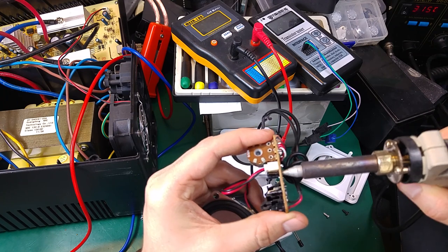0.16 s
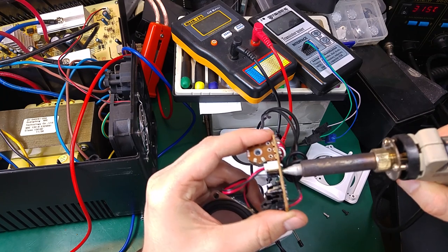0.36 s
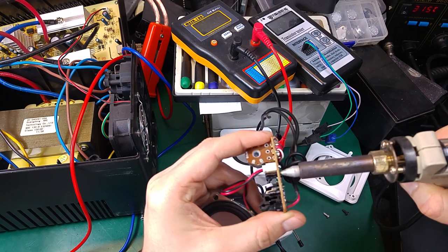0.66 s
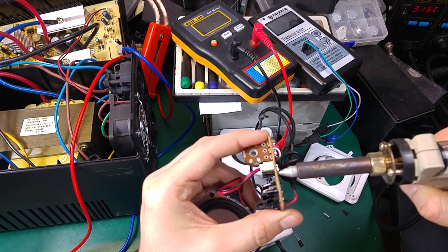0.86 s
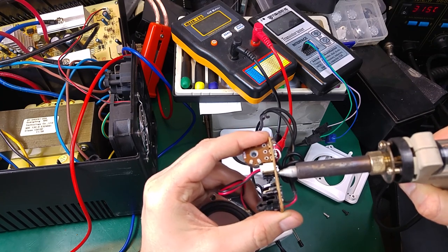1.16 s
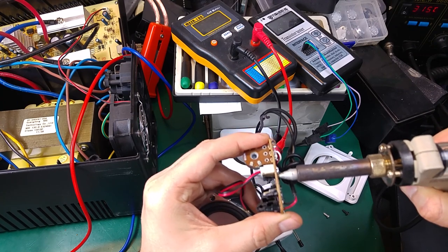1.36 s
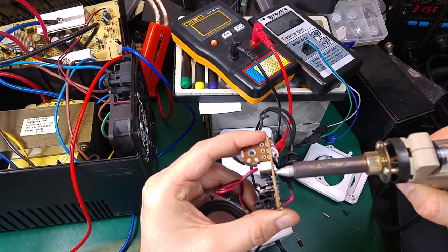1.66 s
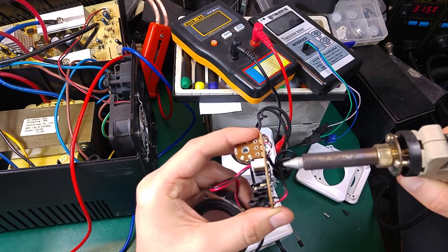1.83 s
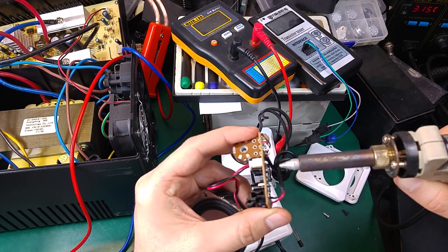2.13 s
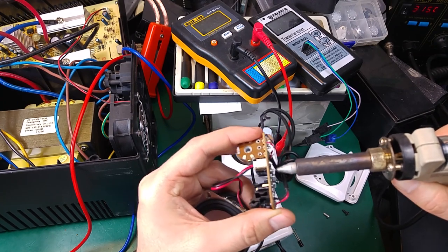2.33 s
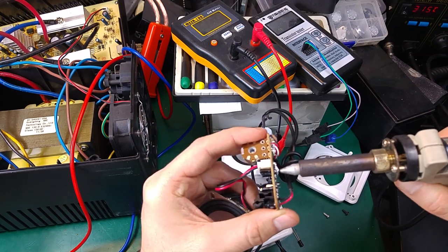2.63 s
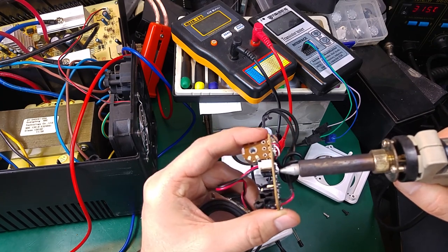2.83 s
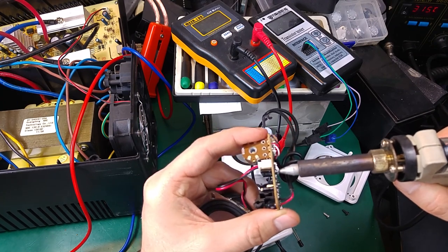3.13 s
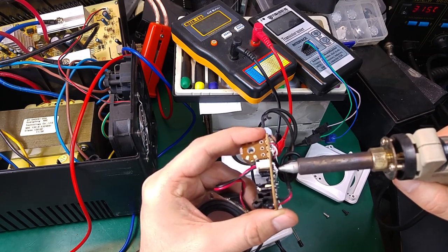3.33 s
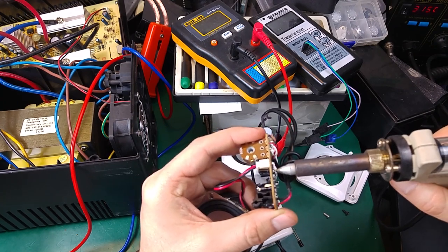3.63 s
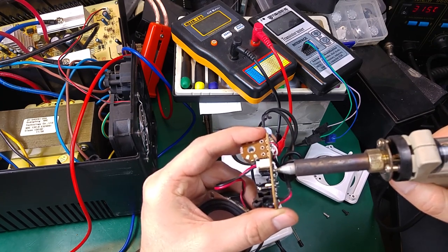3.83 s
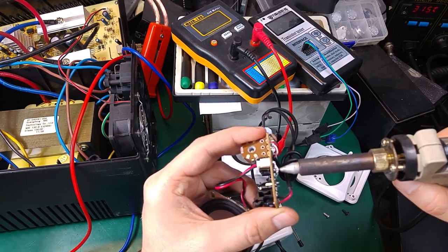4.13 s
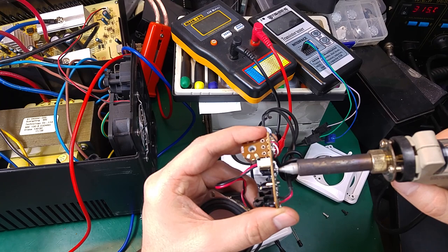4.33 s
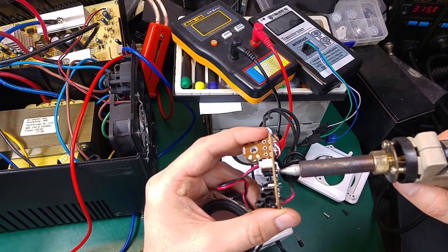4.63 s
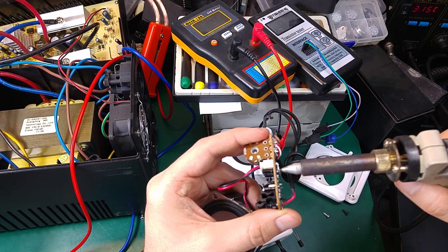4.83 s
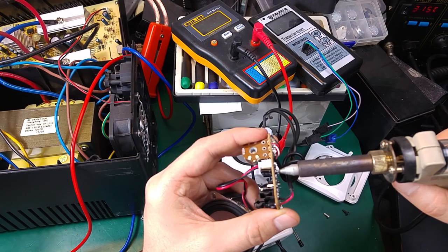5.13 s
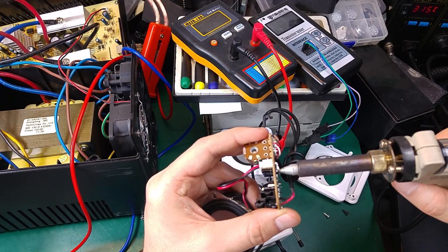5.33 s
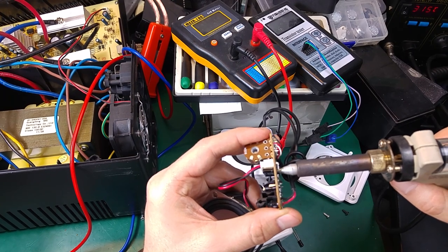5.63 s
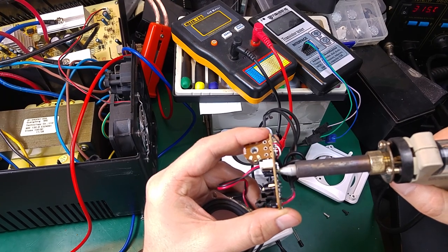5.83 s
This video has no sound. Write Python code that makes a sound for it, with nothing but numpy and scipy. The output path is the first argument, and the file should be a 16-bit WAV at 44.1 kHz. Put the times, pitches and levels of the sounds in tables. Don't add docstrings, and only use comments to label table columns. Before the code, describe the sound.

A desoldering gun's trigger snaps, its small pump buzzes hard for about a second and coasts down, over a steady blowing fan hum.

```python
import sys
import numpy as np
from scipy import signal
from scipy.fft import rfft, irfft, next_fast_len
from scipy.io import wavfile
from scipy.ndimage import uniform_filter1d

SR = 44100
rng = np.random.default_rng(int(sys.argv[2]) if len(sys.argv) > 2 else 0)


def convert_level_to_amplitude(level_db):
    exponent = np.asarray(level_db, float) / 20
    return 10 ** exponent


def dump(signal):
    limited = np.clip(np.atleast_2d(signal).T, -1, 1)
    pcm = np.round(limited * 32767).astype(np.int16)
    wavfile.write(sys.argv[1], SR, pcm)


N = 263718
T = np.arange(N) / SR
TAPS = 16384
HZ = np.fft.rfftfreq(TAPS, 1 / SR) + 1e-3

# multiple, level in dB.
FAN_ORDERS = [(1, -70.5), (2, -45), (4, -57), (7, -62.5), (8, -54.5), (14, -65)]
# centre in Hz, width in
# Hz, gain in dB.
HOUSING = [(104.8, 8.7, 20.5), (216, 13, -29), (762.8, 60, 25), (840, 26, -11)]
# frequency in Hz, level in dB.
COIL_WHINES = [(8640, -64), (8985, -67)]
# frequency in Hz, density in dB per Hz.
DRAUGHT = [(18, -24), (30, -33.5), (191, -17), (218, -16), (255, -11.5), (367, -1), (463, -14), (490, -20),
           (764, -6.5), (1120, -3.5), (1310, -18.5), (1590, -12.5), (3000, -27.5), (3900, -57),
           (6600, -120)]
# centre in Hz, width in Hz, gain in dB.
DRAUGHT_PEAKS = [(380, 27, 2.5), (535, 60, -3.5), (607.6, 15.4, 12.5), (684, 25, 7), (756.5, 24, 9), (1124, 15, 1.5),
                 (1437, 96, 4.5), (1585, 120, 4), (2020, 108, 9.5)]
# frequency in Hz, density in dB per Hz.
BLADE_HISS = [(1470, -32.5), (2500, -12.5), (2640, -7.5), (3410, -9), (4310, -6.5), (4790, -7.5),
              (6620, -0.5), (7350, -3), (7970, -8.5), (11000, -27.5), (14300, -64), (22000, -120)]
# centre in Hz, width in Hz, gain in dB.
BLADES = [(4150, 110, 5), (4540, 74, -3), (4570, 130, -3), (6600, 360, 2.5)]
# centre in seconds, half length in seconds, level in dB.
PASSES = [
    (2.15, 0.53, -67),
    (3.25, 0.5, -65.5),
    (4.25, .35, -71),
    (5.05, 0.14, -67),
    (5.75, 0.45, -69),
]
# start in seconds, peak in dB, pitch in Hz, T60 in seconds.
KNOCKS = [
    (.5868, -36, 3900, 0.0073),
    (0.595, -39, 3920, 0.0069),
    (.6005, -34.5, 3800, 0.0051),
]
# start in seconds, peak in dB, low edge in Hz, T60 in seconds.
CLICKS = [
    (0.6722, -10, 3500, 0.014),
    (.6985, -31.5, 9000, .03),
    (.7212, -21, 9000, .025),
    (1.7965, -12, 5000, 0.035),
    (1.8298, -11.5, 5000, 0.012),
]
# centre in Hz, width in Hz, level in dB.
CASE = [(70.6, 13, -16.5), (106.6, 13.4, -3.5), (144.5, 42, -10), (202.1, 26, -1.5), (278, 30, -8),
        (318, 17, -4.5), (346.7, 14, -5.5), (403.2, 39, -6), (462.6, 14, -9.5), (614, 60, -22.5),
        (678, 66, -7.5), (762, 44.5, 2), (901, 76, -8), (967, 73, -4.5), (1025, 44, -4), (1067, 29, -0.5),
        (1274, 180, -19.5), (1442, 194, -17), (1730, 170, -28)]
# frequency in Hz, density in dB per Hz.
VALVE_AIR = [(710, -44), (1200, 0), (1640, -11.5), (2150, 0), (2320, -12.5), (3010, -9.5), (4000, -12.5),
             (6720, -3), (10300, -15), (14800, -14), (16000, -15.5)]
# centre in Hz, width in Hz, level in dB.
PARTS = [(2141, 52, 5), (3070, 113, -0.5), (3410, 160, -6.5), (1440, 150, -12), (1870, 240, -28),
         (2516, 300, -8.5), (6590, 214, -0.5)]
# running level in dB, start below it in dB, rise in seconds,
# drop at power off in dB, fall in dB per second.
THUMP_LAYER = (-17.5, 18, 0.0275, 3.5, 152)
AIR_LAYER = (-26.5, 12, 0.03, -1, 108)
RATTLE_LAYER = (-26, 21, .03, 3, 130)
# start in seconds, peak in dB.
LAST_STROKES = [
    (1.9152, -14),
    (1.9650, -18),
    (1.9907, -26),
]
# frequency in Hz, left minus right in dB.
BALANCE_DB = [(60, -12.5), (110, -7), (200, -6.5), (380, 0.5), (700, 4), (1290, -2), (2380, -4.5),
              (4400, -9.5), (8120, -8), (15000, -8.5)]
# frequency in Hz, left lead in radians, diffuse share from 0 to 1.
PORTS = [(60, 1.3, .1), (200, .9, .1), (450, .2, .35), (760, -.3, .3), (1000, -1.5, .45), (1250, -2.9, .6),
         (2000, -3.1, .8), (3000, -3.3, .92), (16000, -3.3, .97)]

FAN_HZ, FAN_SAG_HZ, FAN_SAG_S, FAN_RECOVER_S = 113.2, 17, 0.33, 0.45
DRAUGHT_DB, BLADE_HISS_DB, RUMBLE_DB = -38.5, -46.5, -82
TICK_START_S, TICK_PERIOD_S, TICK_DB = 0.0504, 0.10239, -46
SELF_NOISE_DB = -61
PUMP_ON_S, PUMP_OFF_S = 0.701, 1.802
PUMP_HZ, SPIN_UP_HZ, SPIN_UP_S, SETTLE_HZ, SETTLE_S = 70.2, 7, 0.02, 13.2, 0.235
COAST_HZ_PER_S, COAST_END_HZ, COAST_S = 100, 52.6, 0.4
POWER_CUT_S = 0.012
SLAP_DB, SLAP_START_DB, SEATING_S = 11.5, 8.5, 0.25
ALTERNATE_START, ALTERNATE_FULL, ALTERNATE_AT_S, ALTERNATE_SPREAD_S = 0.13, 0.9, 1.36, 0.11
PUFF_1, PUFF_2, PUFF_4 = 0.36, 0.22, 0.22
RATTLE_BUILD_DB_PER_S, RATTLE_SWELL_DB = 2.5, 1.6
SNAP_HZ, SNAP_T60_S = 1200, 0.0045
BLADES_ALIKE, AIR_ALIKE, RATTLE_ALIKE = 0.4, 0.35, 0.65
ROOM_T60_S, EARLY_T60_S, EARLY_DB = 0.53, 0.051, 5.5
LOW_HZ, TOP_HZ = 45, 15780


def level(x, db):
    return x * convert_level_to_amplitude(db) / np.sqrt(np.mean(x ** 2))


def curve(table, hz, column=1):
    table = np.array(table)
    return np.interp(np.log(hz), np.log(table[:, 0]), table[:, column])


def modes_db(modes):
    power = sum(convert_level_to_amplitude(db) ** 2 / (1 + (2 * (HZ - f) / w) ** 2) ** 2 for f, w, db in modes)
    return 10 * np.log10(power)


def bumps_db(bumps, hz):
    return sum(db / (1 + (2 * (hz - f) / w) ** 2) for f, w, db in bumps)


def colour(x, gain_db):
    cepstrum = irfft(np.log(convert_level_to_amplitude(np.maximum(gain_db, -90))))
    cepstrum[1:TAPS // 2] *= 2
    cepstrum[TAPS // 2 + 1:] = 0
    return signal.fftconvolve(x, irfft(np.exp(rfft(cepstrum))))[:N]


def high(x, hz):
    return signal.sosfilt(signal.butter(2, hz, "high", fs=SR, output="sos"), x)


def walk(rate):
    hold = int(SR / rate)
    steps = np.repeat(rng.standard_normal(N // hold + 1), hold)
    return 1.25 * uniform_filter1d(uniform_filter1d(steps, hold), hold)[:N]


def burst(s, db, t60):
    age = T - s
    return convert_level_to_amplitude(db) * (age >= 0) * np.exp(-np.log(1000) * np.maximum(age, 0) / t60)


def wide(gate, gain_db, alike):
    left, right, shared = rng.standard_normal((3, N))
    out = []
    for own, side in ((left, 0.5), (right, -0.5)):
        noise = 2 * side * alike * shared + np.sqrt(1 - alike ** 2) * own
        out.append(colour(noise * gate, gain_db + side * curve(BALANCE_DB, HZ)))
    return np.array(out)


def powered():
    return np.clip(T - PUMP_ON_S, 0, PUMP_OFF_S - PUMP_ON_S), np.maximum(T - PUMP_OFF_S, 0)


def fan():
    on, off = powered()
    hz = FAN_HZ - FAN_SAG_HZ * (1 - np.exp(-on / FAN_SAG_S)) * np.exp(-off / FAN_RECOVER_S)
    turn = 2 * np.pi * np.cumsum(hz * (1 + 0.00093 * walk(5.98))) / SR
    lines = np.zeros(N)
    for k, db in FAN_ORDERS:
        lines += convert_level_to_amplitude(db + bumps_db(HOUSING, k * hz) + 0.56 * walk(5.6)) * np.sin(k * turn)
    for f, db in COIL_WHINES:
        lines += convert_level_to_amplitude(db) * np.sin(2 * np.pi * f * T)
    flicker = convert_level_to_amplitude(0.35 * walk(3.62) + 0.97 * walk(60))
    air = colour(rng.standard_normal(N) * flicker, curve(DRAUGHT, HZ) + bumps_db(DRAUGHT_PEAKS, HZ))
    return np.sqrt(2) * lines + level(air, DRAUGHT_DB)


def blades():
    gain_db = curve(BLADE_HISS, HZ) + bumps_db(BLADES, HZ)
    return level(wide(convert_level_to_amplitude(0.36 * walk(40)), gain_db, BLADES_ALIKE), BLADE_HISS_DB)


def traffic():
    rumble = colour(rng.standard_normal(N), modes_db([(56.6, 25, 0)]))
    swell = sum(convert_level_to_amplitude(db) * np.exp(-((T - s) / half) ** 4) for s, half, db in PASSES)
    return level(rumble, 0) * (convert_level_to_amplitude(RUMBLE_DB) + swell)


def circuit():
    count, since = np.divmod(T - TICK_START_S, TICK_PERIOD_S)
    size_db = 1.9 * rng.standard_normal(64)[count.astype(int)]
    ticks = rng.standard_normal(N) * convert_level_to_amplitude(TICK_DB + size_db) * np.exp(-since / 0.0013)
    hiss = convert_level_to_amplitude(SELF_NOISE_DB) * rng.standard_normal((2, N))
    return high(ticks + hiss, 8200)


def clicks():
    noise = rng.standard_normal(N)
    out = np.zeros(N)
    for s, db, hz, t60 in KNOCKS:
        ring = np.sin(2 * np.pi * hz * (T - s))
        out += burst(s, db + 6.5, t60) * (0.19 * high(noise, 1200) - ring)
    for s, db, hz, t60 in CLICKS:
        out += high(noise * burst(s, db, t60), hz)
    return out


def layer_db(run_db, start_db, rise_s, drop_db, fall_db):
    on, off = powered()
    return run_db - start_db * np.exp(-on / rise_s) - drop_db * (1 - np.exp(-off / POWER_CUT_S)) - fall_db * off


def pump():
    on, off = powered()
    hz = PUMP_HZ - SPIN_UP_HZ * np.exp(-on / SPIN_UP_S) - SETTLE_HZ * np.exp(-on / SETTLE_S)
    hz = np.where(off > 0, np.maximum(hz - COAST_HZ_PER_S * off, COAST_END_HZ), hz)
    turn = 2 * np.pi * np.cumsum(hz * (1 + 0.0019 * walk(24.93))) / SR
    running = np.clip((T - PUMP_ON_S) / 0.01 + 1, 0, 1) * np.clip((COAST_S - off) / 0.05 + 1, 0, 1)

    strokes = sum(np.cos(k * turn + 0.1115 * k * k) for k in range(1, 27))
    seating = 1 / (1 + np.exp((ALTERNATE_AT_S - T) / ALTERNATE_SPREAD_S))
    uneven = ALTERNATE_START + (ALTERNATE_FULL - ALTERNATE_START) * seating
    between = sum(np.cos((k + 0.5) * turn + 0.1096 * k * k) * min(k / 13, 1) ** 4 for k in range(6, 26))
    strokes += uneven * between
    slap_db = SLAP_DB + SLAP_START_DB * np.exp(-on / SEATING_S)
    slap = high(rng.standard_normal(N) * np.exp(0.3 * np.cos(turn - 0.6)), 290)
    push = strokes * convert_level_to_amplitude(0.92 * walk(30.26)) + convert_level_to_amplitude(slap_db) * level(slap, 0)
    thump = level(colour(push, modes_db(CASE)), 0) * convert_level_to_amplitude(layer_db(*THUMP_LAYER))

    puffs = PUFF_1 * np.cos(turn) + PUFF_2 * np.cos(2 * turn + 2.4) + PUFF_4 * np.cos(4 * turn + 0.41)
    valves = np.exp(puffs) * convert_level_to_amplitude(0.31 * walk(50.4))
    air = level(wide(valves, curve(VALVE_AIR, HZ), AIR_ALIKE), 0) * convert_level_to_amplitude(layer_db(*AIR_LAYER))
    shake = convert_level_to_amplitude(RATTLE_SWELL_DB * walk(15) + RATTLE_BUILD_DB_PER_S * (on - 0.5))
    rattle = wide(valves * shake, modes_db(PARTS), RATTLE_ALIKE)
    rattle = level(rattle, -3.5) * convert_level_to_amplitude(layer_db(*RATTLE_LAYER))
    return running * thump, running * (air + rattle)


def last_strokes():
    snaps = sum(burst(s, db, SNAP_T60_S) * np.sin(2 * np.pi * SNAP_HZ * (T - s)) for s, db in LAST_STROKES)
    return -high(snaps, 400)


def ports(x, wet):
    size = next_fast_len(N + SR)
    hz = np.fft.rfftfreq(size, 1 / SR) + 1e-3
    diffuse = np.clip(wet * curve(PORTS, hz, column=2), 0, 1)
    age = T[:SR // 2]
    decay = convert_level_to_amplitude(EARLY_DB - 60 * age / EARLY_T60_S) + convert_level_to_amplitude(-60 * age / ROOM_T60_S)
    spectrum = rfft(x, size)
    out = []
    for side in (0.5, -0.5):
        room = rfft(level(rng.standard_normal(len(age)) * decay, 0), size) / np.sqrt(len(age))
        direct = np.sqrt(1 - diffuse ** 2) * np.exp(1j * side * curve(PORTS, hz))
        tilt = convert_level_to_amplitude(side * curve(BALANCE_DB, hz))
        out.append(irfft(spectrum * tilt * (direct + diffuse * room), size)[:N])
    return np.array(out)


def scene():
    case, air = pump()
    in_room = ports(case + fan() + traffic(), wet=1)
    in_hand = ports(clicks(), wet=0.25)
    return in_room + in_hand + air + blades() + last_strokes()


def roll_off(x):
    return signal.sosfilt(signal.butter(12, 16990, fs=SR, output="sos"), x)


def record(dry):
    trimmed = high(dry + circuit(), LOW_HZ)
    mix = signal.sosfilt(signal.ellip(12, 0.2, 80, TOP_HZ, fs=SR, output="sos"), trimmed)
    return roll_off(mix)


dry = scene()
out = record(dry)
dump(out)
```